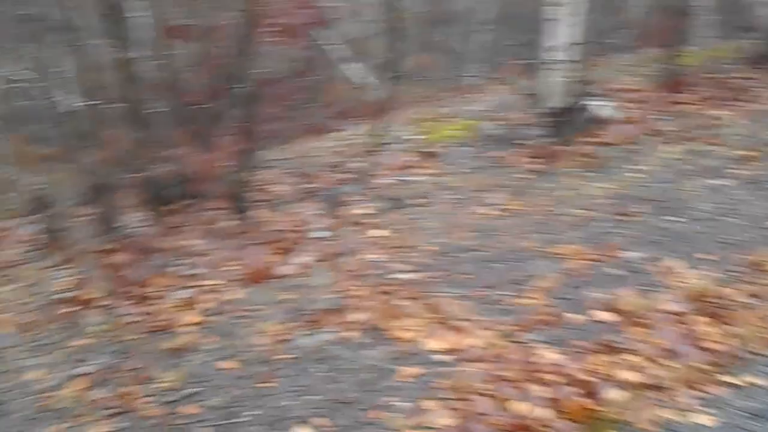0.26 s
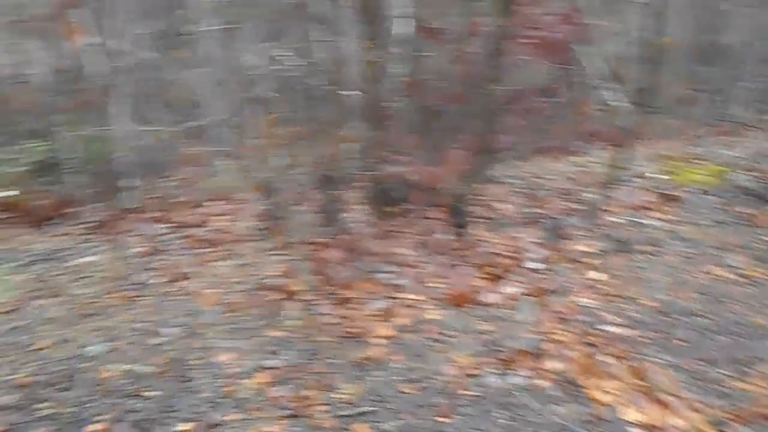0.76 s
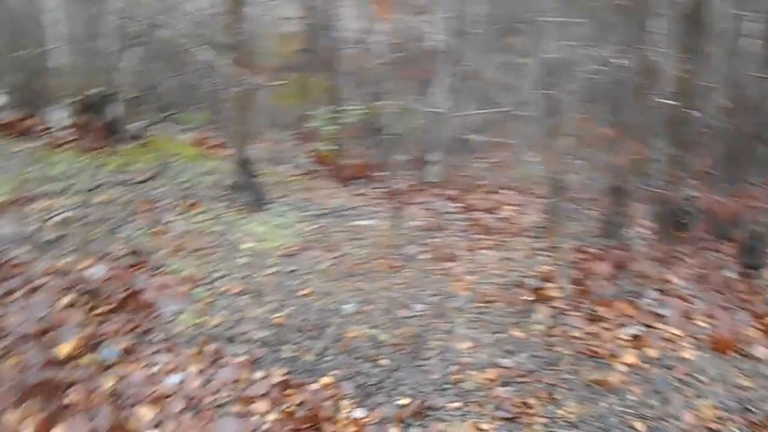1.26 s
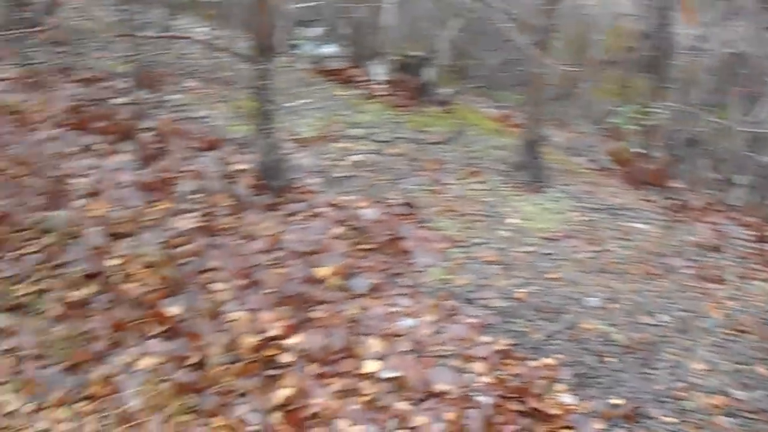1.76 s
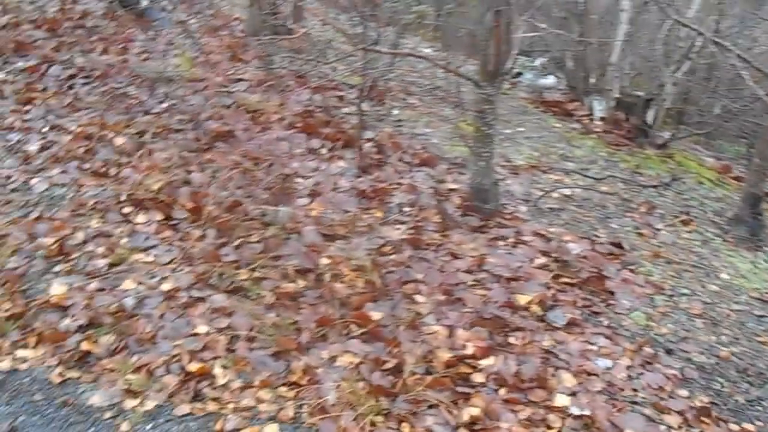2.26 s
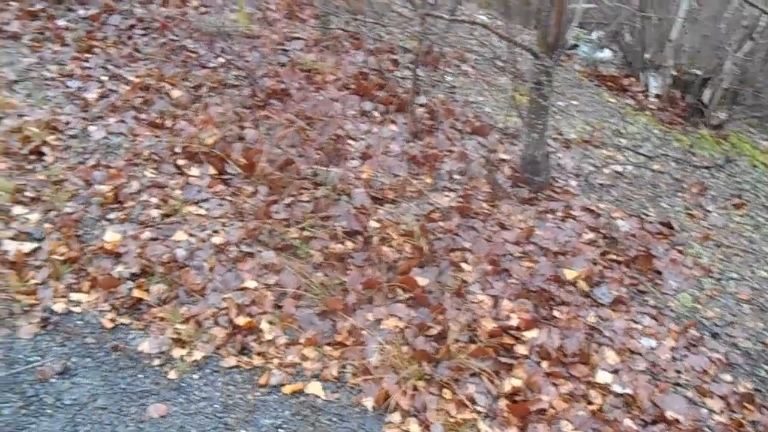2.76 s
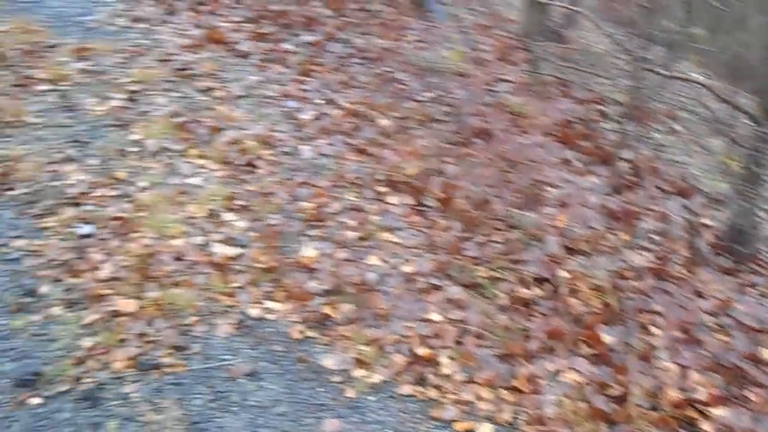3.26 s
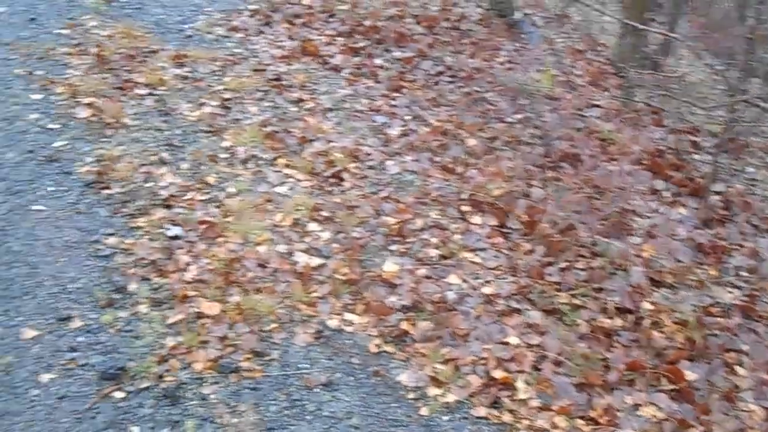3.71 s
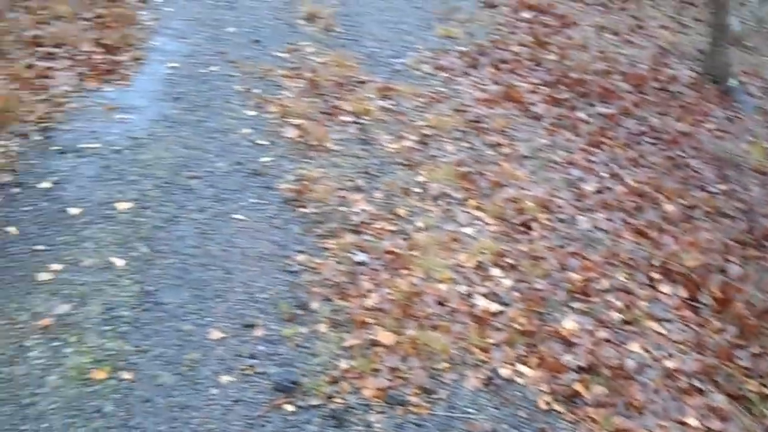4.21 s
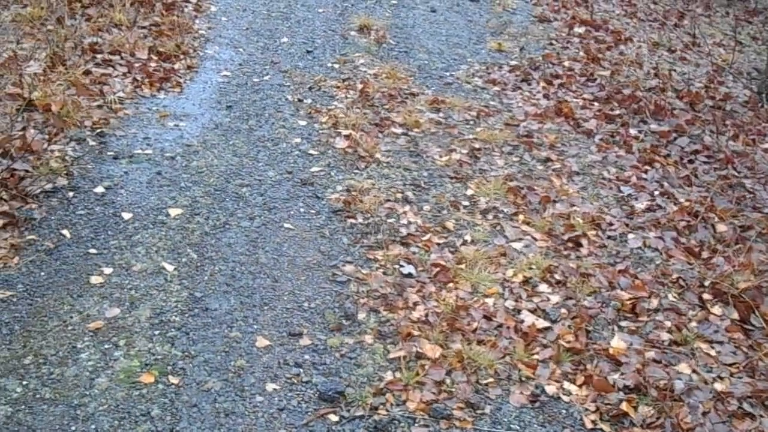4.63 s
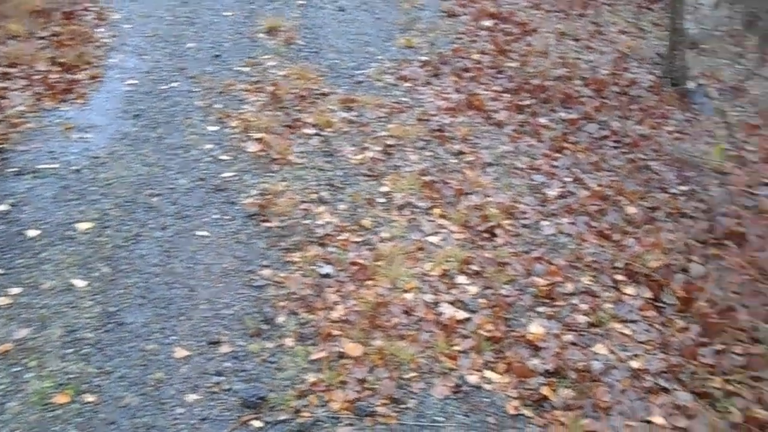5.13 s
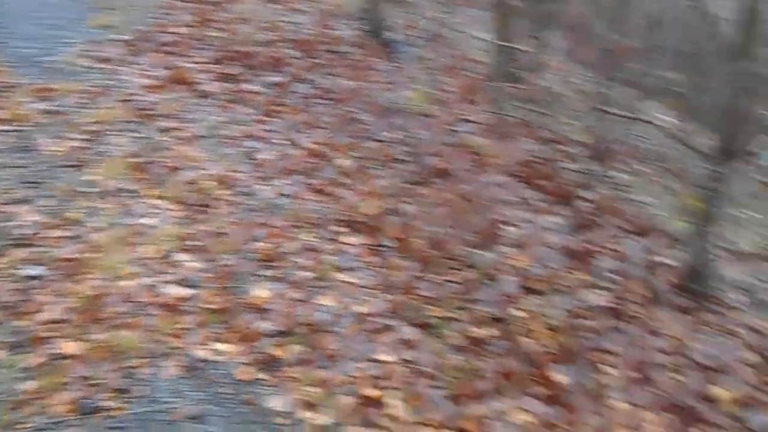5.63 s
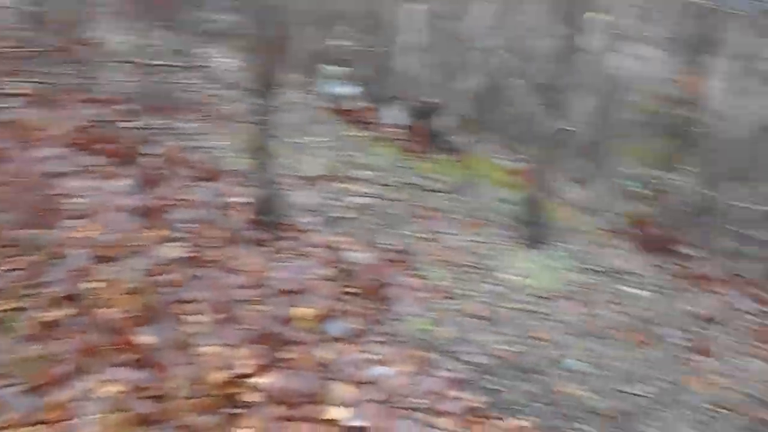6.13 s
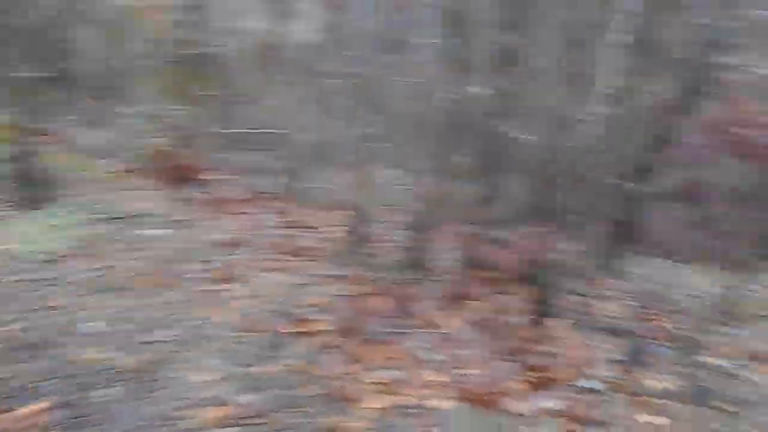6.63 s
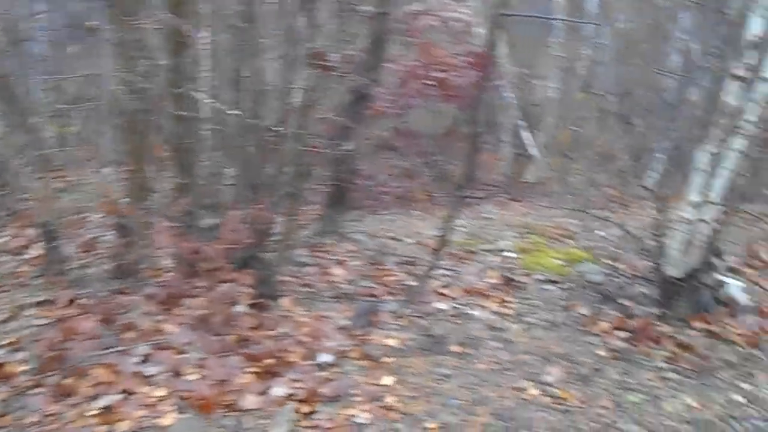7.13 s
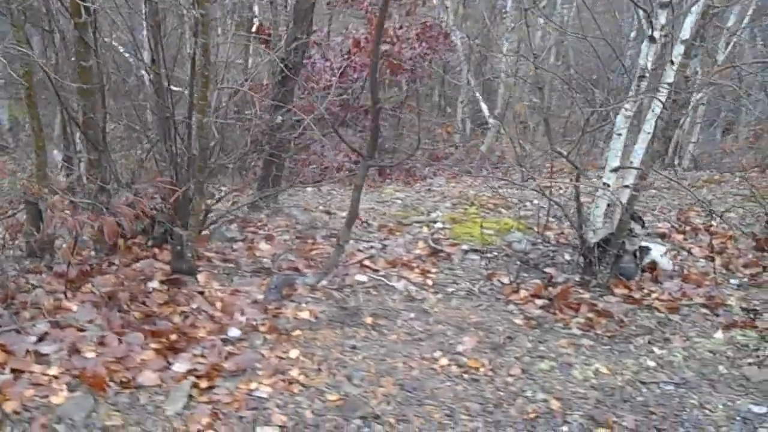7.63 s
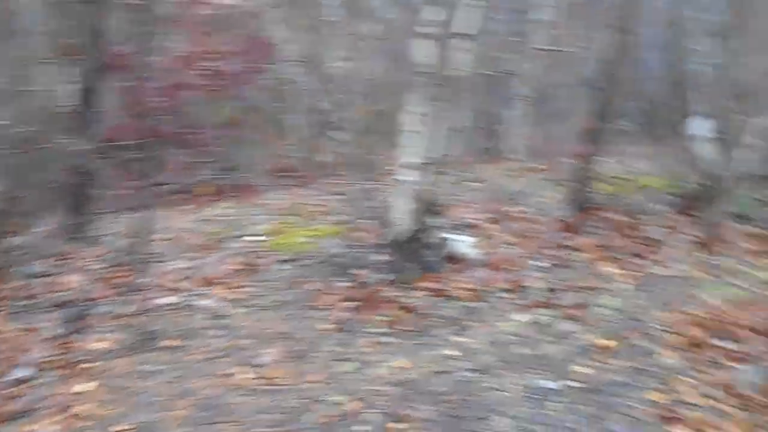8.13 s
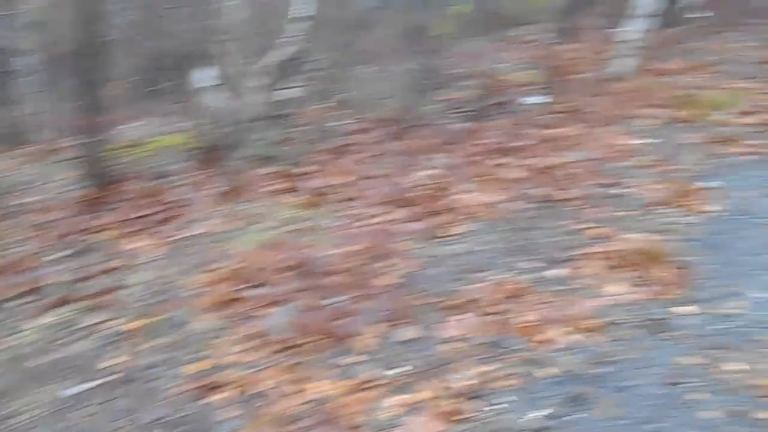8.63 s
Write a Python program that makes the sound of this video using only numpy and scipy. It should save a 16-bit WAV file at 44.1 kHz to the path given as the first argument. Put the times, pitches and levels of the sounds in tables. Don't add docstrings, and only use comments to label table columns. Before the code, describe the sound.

Steady rain hisses and patters on fallen leaves and gravel, with sharp ticks and soft pats nearby, a brief sleeve squeak early, low knocks at the end.

```python
import sys
import numpy as np
from scipy import signal
from scipy.fft import rfft, irfft, next_fast_len
from scipy.io import wavfile
from scipy.ndimage import uniform_filter1d

SR = 44100
rng = np.random.default_rng(int(sys.argv[2]) if len(sys.argv) > 2 else 0)


def dump(signal):
    limited = np.clip(np.atleast_2d(signal).T, -1, 1)
    pcm = np.round(limited * 32767).astype(np.int16)
    wavfile.write(sys.argv[1], SR, pcm)


def boost_factor(decibels):
    exponent = np.asarray(decibels, float) / 20
    return 10 ** exponent


N = 390726

# t/s, level/dB
WIND_RUMBLE = [(0.0, -58), (0.59, -61), (0.74, -49), (0.81, -66.5), (1.06, -49), (1.11, -68), (1.4, -61),
               (4.71, -67), (4.96, -57.5), (5.21, -63), (7.5, -67), (8.0, -57.5), (8.56, -55.5),
               (8.61, -69), (8.71, -47.5), (8.86, -49)]
# t/s, peak level/dB, half width/ms
PORT_KNOCKS = [(8.048, -37, 2.8), (8.058, -38, 1.2), (8.152, -39, 3.1), (8.398, -43, 5.2),
               (8.477, -41, 5.9), (8.542, -42, 6.0), (8.7548, -23.5, 1), (8.76, -40, 1.5),
               (8.767, -44, 1.2), (8.782, -29.5, 1.4), (8.803, -41, 3), (8.82, -42, 2.5), (8.83, -37, 1.7),
               (8.838, -38, 2.5), (8.854, -31, 1.3), (8.7, -44, 4.6)]
# t/s, peak level/dB, fade/(dB per s)
GRIP_SHIFTS = [
    (8.04, -56.5, 37),
    (8.39, -71, 30),
    (8.76, -46, 9.5),
]
# t/s, level/dB, centre f/Hz
SLEEVE_RUSTLES = [
    [(.172, -73, 5000), (.18, -44.5, 5000), (.2, -41, 4800), (.225, -45.5, 4000), (.25, -58, 3500)],
    [(1.42, -65, 1600), (1.44, -55, 1500), (1.5, -54, 800), (1.56, -55, 650), (1.62, -53, 650),
     (1.68, -62, 550)],
]
# t/s, slip rate f/Hz, pressure level/dB
SQUEAK_SLIPS = [(.212, 510, -70), (.225, 470, -60), (.272, 385, -48.5), (.31, 710, -42), (.35, 1800, -42),
                (.36, 1920, -35.5), (.365, 2130, -45), (.376, 2420, -39), (.386, 2600, -58)]
# multiple of slip rate, level/dB
SLIP_PARTIALS = [(.5, -8.5), (1, 2), (1.5, -9.5), (2, -6), (2.5, -15), (3, -11.5), (4, -20)]
# f/Hz, width/Hz, level/dB
SLEEVE_RESONANCES = [(2500, 880, 0.5), (5900, 770, -3)]
# f/Hz, level/dB per Hz
FAR_RAIN_COLOUR = [(150, -12.5), (252, -5), (832, -1), (1140, -5.5), (1860, -2.5), (3520, 0.5), (7380, -8),
                   (7890, -11.5)]
# t/s, dull patter level/dB
LEAF_BED_LEVEL = [(0.0, -51.5), (0.1, -51), (1.23, -56), (1.65, -54), (1.83, -56), (2.84, -57),
                  (3.06, -53.5), (3.28, -57.5), (3.77, -56), (3.95, -58), (6.07, -59), (7.5, -57),
                  (7.87, -58), (8.64, -56.5), (8.86, -54)]
# f/Hz, width/Hz, lift (share of the input added)
CASE_CAVITIES = [(865, 62, 0.25), (1362, 110, 0.43), (2380, 160, 0.16), (3500, 130, 0.25)]
# crest t/s, peak level/dB, ring f/Hz
SOFT_PATS = [(0.0071, -35, 507), (0.1052, -40, 590), (0.1771, -32.5, 660), (0.245, -35, 540),
             (0.4055, -35, 695), (0.4659, -36, 700), (0.5783, -37, 590), (0.6622, -38.5, 492),
             (0.7918, -39, 377), (0.9658, -37, 410), (1.1485, -33, 870), (1.2666, -37, 695),
             (1.3484, -33, 686), (1.5104, -36, 700), (1.525, -35, 540), (2.12, -33, 550),
             (2.1846, -35.5, 550), (2.2735, -36, 550), (3.0246, -34, 880), (3.2238, -40, 720),
             (3.43, -33, 735), (4.5978, -42, 460), (6.0687, -40.5, 640), (6.6603, -39, 850),
             (6.8958, -37, 850), (7.312, -37, 780), (7.9159, -30.5, 820), (8.2669, -34.5, 623),
             (8.4505, -37, 850), (8.7865, -36, 500)]
# crest t/s, peak level/dB, ring f/Hz
LEAF_TAPS = [(0.628, -35.5, 1310), (0.931, -35, 1430), (1.0287, -33.5, 930), (1.444, -28, 1370),
             (1.8463, -31, 1570), (1.8857, -33, 930), (2.1443, -36, 920), (2.329, -36, 890),
             (2.8679, -32.5, 990), (3.042, -35, 1640), (3.214, -38, 1390), (3.223, -32, 1580),
             (3.43, -43, 1380), (3.8802, -34, 1160), (4.0584, -33, 1090), (4.4194, -35, 1180),
             (4.4708, -36, 1000), (4.5673, -33, 1010), (4.5962, -34, 1110), (4.939, -37, 920),
             (5.6163, -38, 1010), (5.8799, -37.5, 1100), (6.4664, -33, 1550), (6.4758, -31, 1030),
             (6.6046, -36, 925), (7.4114, -35, 1180), (7.6387, -35, 1100), (8.0799, -31.5, 1440),
             (8.3188, -34, 1070), (8.5602, -32, 1200)]
# crest t/s, peak level/dB, ring f/Hz
BRIGHT_TICKS = [(0.173, -29, 2640), (0.4846, -29, 2820), (0.4924, -32, 2810), (0.5744, -30, 2190),
                (1.064, -35, 2400), (1.4636, -34, 2020), (1.6165, -29.5, 7300), (1.761, -33, 6220),
                (3.3425, -29, 4220), (2.1443, -31.5, 2210), (2.229, -34, 5750), (3.042, -30, 4440),
                (3.0876, -28, 5060), (3.4826, -29, 6800), (4.064, -33, 7350), (4.2806, -31, 7060),
                (5.0338, -33, 2410), (5.165, -35, 3390), (5.3466, -32, 4040), (6.0207, -32, 5710),
                (6.7794, -30.5, 7400), (6.8015, -31, 2420), (7.2717, -30.5, 6790), (7.4491, -33, 4400),
                (7.637, -32, 4400), (7.6643, -35, 1850), (7.9202, -30.5, 2620), (8.1557, -33, 2850),
                (8.5985, -30, 5230), (8.68, -30, 4600)]
# crest t/s, peak level/dB, ring f/Hz, cycles to fade
NEAREST_SPLASHES = [(0.0071, -25.5, 3140, 5), (0.0766, -30, 1320, 9.4), (0.086, -31.5, 1870, 14),
                    (0.0876, -28.5, 550, 1.4), (0.1735, -24.5, 6560, 13.8), (0.1742, -24, 3560, 6.8),
                    (0.1744, -26, 1020, 2), (0.7911, -25, 3680, 26), (0.7913, -28.5, 800, 8.3),
                    (0.7913, -15.5, 2020, 12), (1.0559, -27.5, 630, 2.4), (1.429, -33, 1440, 18),
                    (1.4443, -28, 1950, 10.9), (1.989, -30, 3160, 19), (3.0404, -34, 7000, 44.0),
                    (3.042, -31, 5510, 43), (3.1222, -24, 6010, 30), (3.1245, -28, 2880, 6.1),
                    (3.2146, -29, 750, 5.7), (3.342, -27, 5050, 22), (3.4826, -30.5, 3600, 26),
                    (3.482, -30.5, 4750, 26), (3.639, -33.5, 5060, 40), (4.2804, -34, 4250, 8.3),
                    (5.3009, -31, 5060, 19), (5.301, -30, 3280, 27), (6.4762, -26, 3140, 13),
                    (7.1761, -30, 940, 6.7), (8.3156, -29.5, 3580, 14.7), (8.51, -27.5, 2020, 10)]

CREST_TURNS = 0.8


def rms_one(x):
    return x / np.sqrt(np.mean(x ** 2) + 1e-20)


def in_time(rows):
    s, *columns = np.transpose(rows)
    t = np.arange(N) / SR
    return [np.interp(t, s, column) for column in columns]


def drift(rate_hz):
    r = np.exp(-80 * np.pi * rate_hz / SR)
    white = rng.standard_normal(N // 40 + 2002)
    slow = signal.lfilter([1], [1, -2 * r, r * r], white)[2000:]
    return np.interp(np.arange(N) / 40, np.arange(len(slow)), rms_one(slow))


def band(x, low_hz, high_hz):
    sos = signal.butter(2, [low_hz, high_hz], "band", fs=SR, output="sos")
    return signal.sosfilt(sos, x)


def resonance(x, hz, width_hz):
    r = np.exp(-np.pi * width_hz / SR)
    poles = [1, -2 * r * np.cos(2 * np.pi * hz / SR), r * r]
    return signal.lfilter([(1 - r * r) / 2, 0, (r * r - 1) / 2], poles, x + 1e-18)


def add(out, s, x):
    at = round(s * SR)
    out[at:at + len(x)] += x[:N - at]


def wind():
    rumble_db, = in_time(WIND_RUMBLE)
    t = np.arange(N) / SR
    buffet = boost_factor(-65.5 + 0.15 * (rumble_db - np.median(rumble_db)))
    for s, peak_db, fade_db_per_s in GRIP_SHIFTS:
        rise = np.clip(1 + (t - s) / 0.047, 0, 1)
        buffet = buffet + boost_factor(peak_db - fade_db_per_s * np.maximum(t - s, 0)) * rise
    white = rng.standard_normal((2, N))
    out = boost_factor(rumble_db + 2.2 * drift(6.9)) * rms_one(band(white[0], 12, 45))
    out += buffet * boost_factor(2.2 * drift(18)) * rms_one(band(white[1], 38, 170))
    for s, peak_db, half_ms in PORT_KNOCKS:
        u = np.arange(-0.025, 0.025, 1 / SR) * 1000 / half_ms
        dip = 1.3 * np.exp(-u ** 2)
        rebound = 0.3 * np.exp(-u ** 2 / 9.0)
        add(out, s - 0.025, boost_factor(peak_db) * (rebound - dip))
    return out


def rustle():
    out = np.zeros(N)
    for rows in SLEEVE_RUSTLES:
        level_db, hz = in_time(rows)
        start, stop = round(rows[0][0] * SR), round(rows[-1][0] * SR)
        grit = rng.standard_normal(N) * boost_factor(1.8 * drift(120))
        for i in range(start, stop, 256):
            piece = resonance(grit[i - 512:i + 256], hz[i], 0.65 * hz[i])[512:]
            even_loudness = np.sqrt(SR / (1.85 * hz[i]))
            out[i:i + 256] = boost_factor(level_db[i:i + 256]) * piece * even_loudness
    return out


def squeak():
    rate, tone_db = in_time(SQUEAK_SLIPS)
    scratch_db = tone_db + np.interp(rate, [620, 1300], [-6, 1])
    live = np.arange(round(SQUEAK_SLIPS[0][0] * SR), round(SQUEAK_SLIPS[-1][0] * SR))
    rate = rate[live]
    loose = 1 - np.clip((rate - 1680) / 150, 0, 1)
    white = rng.standard_normal((8, len(live)))
    chance = uniform_filter1d(uniform_filter1d(white, size=55), size=55)
    chance /= chance.std()
    jitter = (0.008 + 0.035 * loose) * chance[0]
    phase = 2 * np.pi * np.cumsum(rate * (1 + jitter)) / SR
    tone = 0
    for (k, level_db), ragged in zip(SLIP_PARTIALS, chance[1:]):
        fold_db = 11 * np.exp(-(np.log2(k * rate / 2370) / 0.41) ** 2)
        ragged_db = (5 * loose + 0.5 if k == 1 else 4.5) * np.clip(ragged, -2.5, 0.8)
        ragged_db += (k == 1) * -6 * loose * np.clip(rate / 1000, 0, 1)
        treble_loss_db = 2.7 * np.maximum(k * rate / 1000 - 4, 0)
        tone = tone + boost_factor(level_db + fold_db + ragged_db - treble_loss_db) * np.sin(k * phase)
    grit = rng.standard_normal(len(live)) * (1 + 0.42 * np.sin(phase))
    scratch = rms_one(sum(boost_factor(level_db) * resonance(grit, hz, width_hz)
                          for hz, width_hz, level_db in SLEEVE_RESONANCES))
    out = np.zeros(N)
    out[live] = np.sqrt(2) * boost_factor(tone_db[live]) * tone + boost_factor(scratch_db[live]) * scratch
    return out


def hiss(trends_db, patchy_db):
    out = 0
    together = drift(25)
    edges_hz = 130 * 2 ** np.arange(0, 6.1, 1 / 3)
    white = rng.standard_normal((2, N))
    colour_hz, colour_level_db = np.transpose(FAR_RAIN_COLOUR)
    for k, (low, high) in enumerate(zip(edges_hz, edges_hz[1:])):
        hz = np.sqrt(low * high)
        trend_db = trends_db[int(hz > 500) + int(hz > 1500)]
        flicker_db = patchy_db * (0.62 * together + drift(30))
        colour_db = np.interp(np.log(hz), np.log(colour_hz), colour_level_db)
        level_db = colour_db + flicker_db + trend_db - np.median(trend_db)
        out = out + boost_factor(level_db) * band(white[k % 2], low, high)
    return rms_one(out)


def patter(per_s, low_hz, high_hz, cycles, spread_db, most):
    sizes = boost_factor(spread_db * np.minimum(rng.exponential(1, N), most)) * rng.choice([-1, 1], N)
    born = rng.random(N) < per_s * boost_factor(2.5 * drift(6)) / SR
    dealt = rng.integers(0, 14, N)
    out = 0
    for k, hz in enumerate(np.geomspace(low_hz, high_hz, num=14)):
        hits = sizes * born * (dealt == k)
        ring = resonance(resonance(hits, hz, 2.7 * hz / cycles), hz, hz)
        out = out + ring * np.sqrt(high_hz / hz)
    return rms_one(out)


def rain():
    bed_db, = in_time(LEAF_BED_LEVEL)
    swing_db = bed_db - np.median(bed_db)
    murmur_db, low_db, high_db = 1.64 * swing_db, -55 + swing_db, -48.5 + 0.18 * swing_db
    far = boost_factor(-49) * hiss([murmur_db, low_db, high_db], patchy_db=0.96)
    leaves = boost_factor(low_db - 2.5) * patter(260, 419, 1900, cycles=4.0, spread_db=5.0, most=2.65)
    gravel = boost_factor(high_db - 6.5) * patter(900, 1940, 7800, cycles=5.5, spread_db=4.5, most=2.94)
    mixed = far + leaves + gravel
    return mixed + sum(lift * resonance(mixed, hz, width_hz) for hz, width_hz, lift in CASE_CAVITIES)


def struck(hz, cycles):
    cycles_to_fade = max(cycles, 1)
    turns = np.arange(round(SR * (cycles_to_fade + 1) / hz)) * hz / SR
    swell = np.sin(np.pi / 2 * np.minimum(turns / 0.9, 1)) ** 2
    envelope = swell * boost_factor(-60 * turns / cycles_to_fade)
    return np.cos(2 * np.pi * (turns - CREST_TURNS)) * envelope / envelope.max()


def near_drops():
    out = np.zeros(N)
    t = np.arange(500) / SR
    white = rng.standard_normal((len(NEAREST_SPLASHES), 500))
    for (s, peak_db, hz, cycles), grit in zip(NEAREST_SPLASHES, white):
        add(out, s - CREST_TURNS / hz, boost_factor(peak_db) * struck(hz, cycles))
        spray = rms_one(band(grit, 0.55 * hz, min(1.8 * hz, 9000)))
        add(out, s + 0.00068, boost_factor(peak_db - 18.5) * spray * boost_factor(-60 * t / 0.016))
    for s, peak_db, hz in SOFT_PATS + LEAF_TAPS + BRIGHT_TICKS:
        cycles = 5.9 * np.sqrt(hz / 1000)
        add(out, s - CREST_TURNS / hz, boost_factor(peak_db) * struck(hz, cycles))
    return out


def scene():
    mono = wind() + rustle() + squeak() + rain() + near_drops()
    return np.tile(mono, (2, 1))


def roll_off(x):
    return signal.sosfilt(signal.butter(12, 8540, fs=SR, output="sos"), x)


def record(dry):
    size = next_fast_len(N + 4096)
    above_hz = np.fft.rfftfreq(size, 1 / SR) - 7990
    cut_db = np.interp(above_hz, [0, 50, 150, 240, 330], [0, -9, -30, -34, -70])
    mix = irfft(rfft(dry, size) * boost_factor(cut_db), size)[:, :N]
    return roll_off(mix)


dry = scene()
out = record(dry)
dump(out)
```